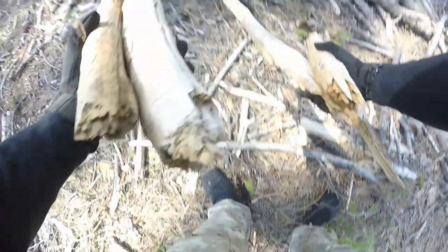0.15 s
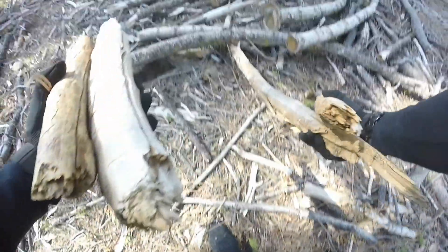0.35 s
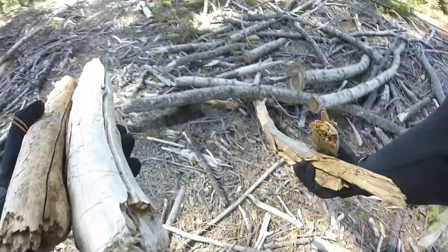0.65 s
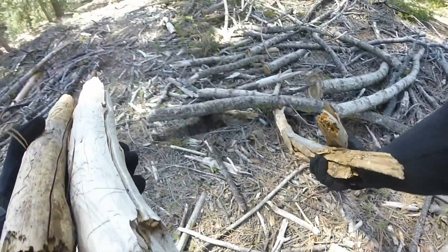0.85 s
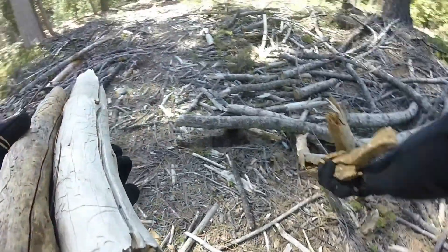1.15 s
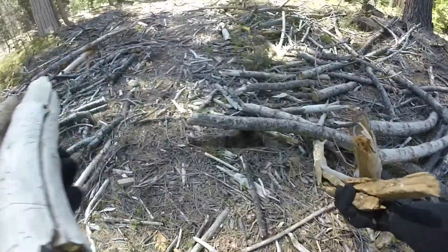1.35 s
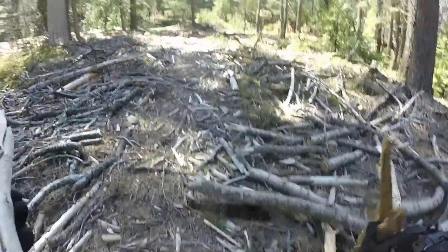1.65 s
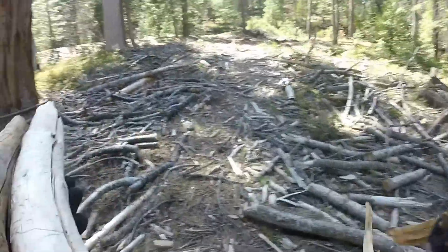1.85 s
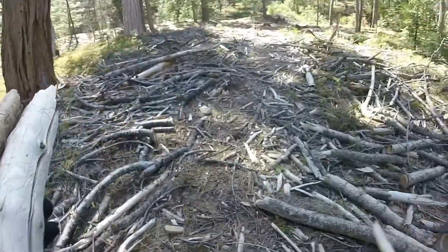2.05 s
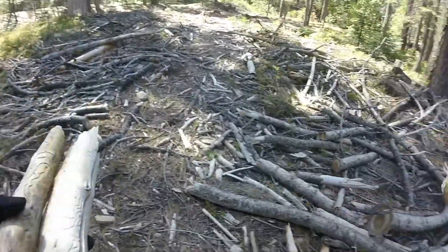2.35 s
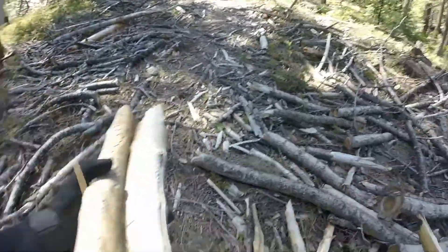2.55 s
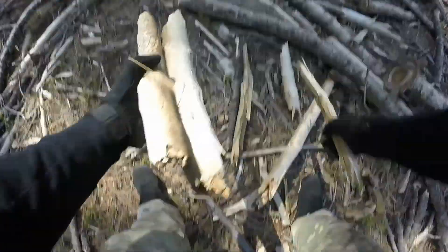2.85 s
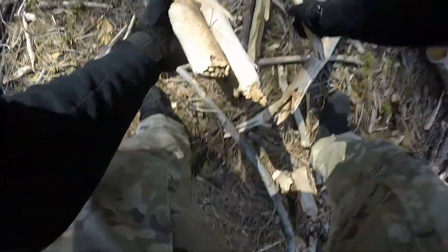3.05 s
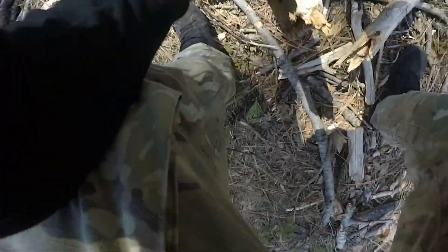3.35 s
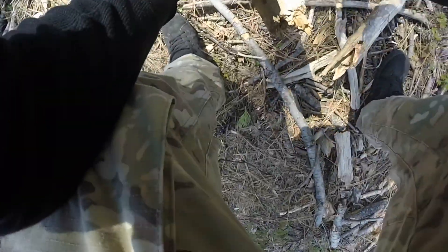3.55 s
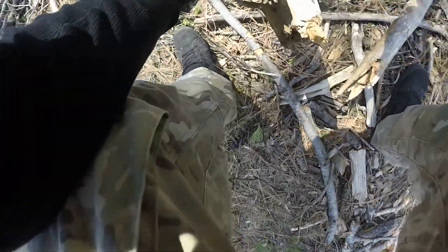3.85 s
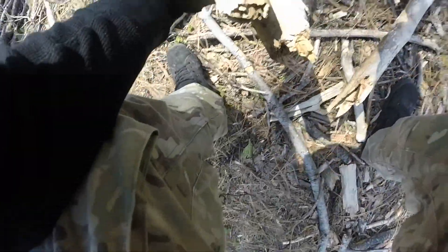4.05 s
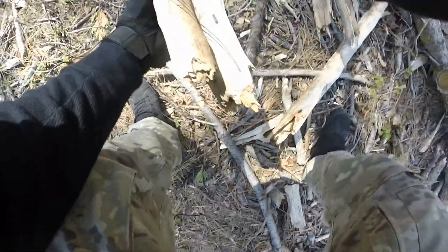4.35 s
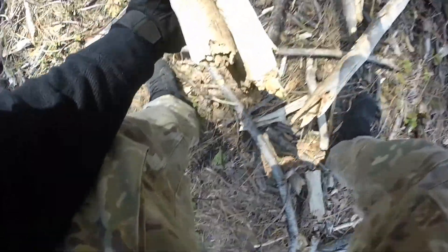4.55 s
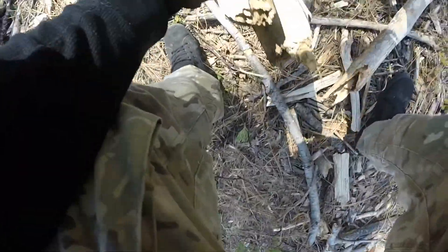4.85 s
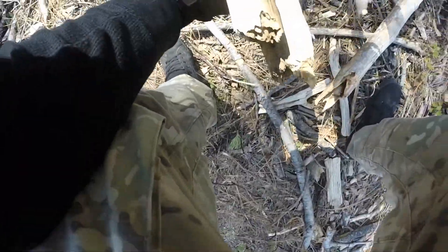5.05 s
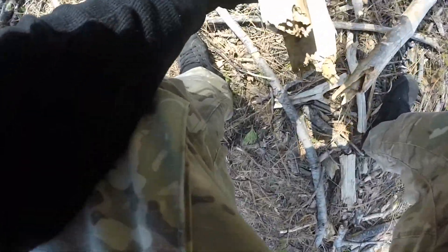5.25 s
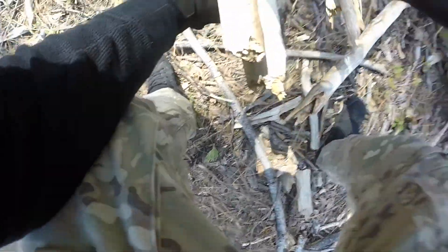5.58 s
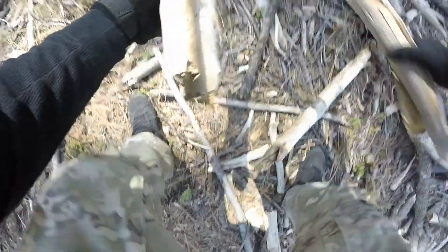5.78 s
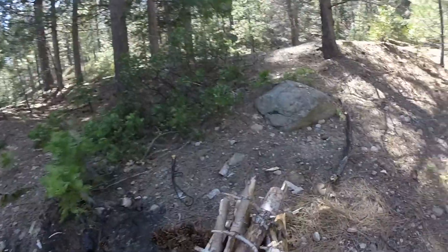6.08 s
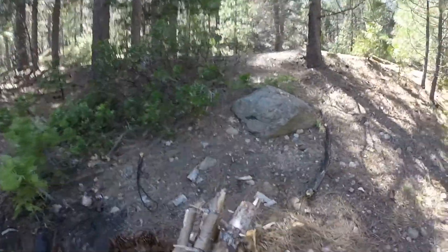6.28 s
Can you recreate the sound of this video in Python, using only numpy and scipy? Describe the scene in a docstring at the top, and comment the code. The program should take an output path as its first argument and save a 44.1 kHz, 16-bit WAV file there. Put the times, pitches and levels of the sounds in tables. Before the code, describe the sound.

Cloth rustles, brittle wood breaks in a sharp tearing crack, then knocks, stick clacks, crunching twigs and a low breeze rumble follow in a forest.

```python
"""At first clothes rustle and the dry branch gives a few cracks; then it breaks, tearing in a run of splinters.
Its pieces thump down, and gathered sticks clack together: struck wood heard as sums of damped modes.
Next come crunched twigs, dragged sticks, thumps and small squeaks: random impulses, noise and gliding sines.
Near the end the level dips briefly, a breeze rumbles as low noise, and a boot scuffs as dense grains.
Throughout, gloves, sleeves and litter rustle as coloured noise that follows the effort of the body."""
import sys
import numpy as np
from scipy import signal
from scipy.fft import rfft, irfft, next_fast_len
from scipy.io import wavfile
from scipy.ndimage import map_coordinates

SR = 44100
rng = np.random.default_rng(int(sys.argv[2]) if len(sys.argv) > 2 else 0)


def store_pcm(level_fs):
    """Save levels as 16-bit WAV."""
    pcm = np.round(np.clip(level_fs, -1, 1) * 32767).astype(np.int16)
    wavfile.write(sys.argv[1], SR, np.atleast_2d(pcm).T)


N = 283122
RING_TIME = np.arange(SR // 8) / SR  # time axis of one blow, s
BLOW_SAMPLES = SR / 100  # a blow's level is its energy spread over 10 ms


def amp(db):
    """Level to amplitude ratio: 20 dB is a factor of ten."""
    return 10 ** (np.asarray(db) / 20)


def unit(x):
    """Normalisation to an rms value of 1."""
    return x / np.sqrt(np.mean(x ** 2) + 1e-20)


def along(points, hz):
    """Logarithmic frequency scale: interpolate (f/Hz, value) points along it."""
    f, values = np.transpose(points)
    return np.interp(np.log(hz + 1), np.log(f + 1), values)


def curves(rows):
    """Linear interpolation in time: one value per sample for each column after t/s."""
    s, *columns = np.transpose(rows)
    return [np.interp(np.arange(N) / SR, s, column) for column in columns]


def wobble(rate):
    """Slow random fluctuation: a smooth curve through rate random knots a second."""
    knots = rng.standard_normal(int(N * rate / SR) + 4)
    return map_coordinates(knots, [np.arange(N) * rate / SR])


def filtered(x, response):
    """Linear filtering: the spectrum of x times a response of frequency."""
    m = next_fast_len(len(x) + SR // 2)
    hz = np.fft.rfftfreq(m, 1 / SR)
    return irfft(rfft(x, m) * response(hz), m)[:len(x)]


def coloured(x, spectrum):
    """Spectral shaping: x given a spectrum, at rms 1."""
    return unit(filtered(x, lambda hz: amp(along(spectrum, hz))))


def click(spectrum, tilt_db=0, ripple_db=3.0):
    """Minimum phase: the causal impulse of a spectrum, tilted per octave, with random small resonances."""
    n = len(RING_TIME)
    hz = np.fft.rfftfreq(n, 1 / SR)
    ripple = map_coordinates(rng.standard_normal(size=48), [np.linspace(0, 47, len(hz))])
    # the tilt starts at the second point of the spectrum
    octaves = np.log2(np.maximum(hz / spectrum[1][0], 1))
    level_db = along(spectrum, hz) + tilt_db * octaves + ripple_db * ripple
    cepstrum = irfft(np.log(amp(level_db)), n)
    # keeping only positive times of the cepstrum makes the impulse causal
    causal = 2 * cepstrum[:n // 2] * (np.arange(n // 2) > 0)
    return irfft(np.exp(rfft(causal, n)), n)


def ring(modes, scatter_db=2, detune=0.025, attack=0.00041):
    """Modal superposition: damped sines (f/Hz, level/dB, t60/s), scattered anew at every call."""
    t, out = RING_TIME, 0
    for k, (hz, db, t60) in enumerate(modes):
        phase = 2 * np.pi * hz * np.exp(detune * rng.normal()) * t
        gain = (-1) ** k * amp(db + scatter_db * rng.normal())
        out = out + gain * np.exp(-np.log(1000) * t / t60) * np.sin(phase)
    return out * (1 - np.exp(-t / attack))


def burst(length, share):
    """Cascade rupture: one main impulse, then a dying shower with share times its energy."""
    n = len(RING_TIME)
    size = amp(10 * np.minimum(rng.standard_normal(n), 2.3))
    shower = rng.standard_normal(n) * size * np.exp(-RING_TIME / length)
    shower *= np.sqrt(abs(share)) / np.linalg.norm(shower)
    shower[0] += 1
    return shower


def add(track, s, force, response, db):
    """Convolution principle: mix in at time s a force played through an impulse response."""
    wave = signal.fftconvolve(force, response)[:len(RING_TIME)]
    wave = amp(db) * np.sqrt(BLOW_SAMPLES) * wave / np.linalg.norm(wave)
    room_left = track[round(s * SR):][:len(wave)]
    room_left += wave[:len(room_left)]


def grains(rate, spread_db):
    """Random impulse process: impulses of uneven size and either sign, rate a second."""
    size_db = spread_db * np.clip(rng.standard_normal(N), -2, 2)
    return (rng.random(N) < rate / SR) * rng.choice([-1, 1], N) * amp(size_db)


def crackle(rate, spread_db, spectrum, count=6):
    """Superposed impulse trains: small snaps of a few differently coloured fibres, at rms 1."""
    voices = []
    for _ in range(count):
        voices.append(signal.fftconvolve(burst(0.0021, share=7.0), click(spectrum, ripple_db=6.5)))
    return unit(sum(signal.fftconvolve(grains(rate / count, spread_db), unit(v))[:N] for v in voices))


def strokes(rows, attack_s, release_s):
    """Trapezoidal envelope: each move (t/s at full strength, hold/s, level/dB) swells, holds and fades."""
    t, gain = np.arange(N) / SR, 0
    for s, hold, db in rows:
        gain = gain + amp(db) * np.interp(t, [s - attack_s, s, s + hold, s + hold + release_s], [0, 1, 1, 0])
    return gain


# higher modes of the wood [f/Hz, level/dB, t60/s before the life factor]
UPPER_MODES = [(1236, -1, 0.012), (1330, -1.5, 0.036), (1650, -3, 0.0079), (1920, -6, 0.048),
               (2157, 2.5, 0.02), (2337, 2, 0.035), (2820, -1, 0.012)]


def splinter(life, attack=.0001):
    """Free vibration of a small piece: randomly detuned higher modes, their t60 multiplied by life."""
    modes = [(hz, db, t60 * life) for hz, db, t60 in UPPER_MODES]
    return ring(modes, scatter_db=6.5, detune=0.11, attack=attack)


# fractures [t/s, body level/dB, ring level/dB, snap level/dB, snap tilt/(dB per octave)]
CRACKS = [(0.067, -44.5, -43, -42.5, -16), (0.167, -65, -59, -47.5, -15), (0.670, -34.5, -43, -44, -7.5),
          (1.0132, -60, -46.5, -51.5, 7), (1.033, -41.5, -33.5, -32.5, -0.5), (1.242, -50, -40, -42.5, 2),
          (1.545, -53, -31.5, -43, 9), (1.562, -13, -17.5, -24, 3), (1.5646, -17.5, -18, -31, 4),
          (1.575, -33, -22.5, -35, -3), (1.609, -23.5, -20.5, -26.5, 2), (1.635, -53, -36, -37.5, 2),
          (1.654, -33, -46, -35, 3), (1.666, -37, -32.5, -40.5, 8), (1.674, -31.5, -36, -29, -8),
          (1.6945, -38, -29.5, -38.5, 1), (1.726, -26, -35, -40, 15), (1.782, -38, -34, -42, -12),
          (1.8181, -35, -29, -48, -11), (1.8467, -32.5, -30.5, -36, -14), (1.913, -43, -40.5, -47.5, -7),
          (1.978, -43.5, -44.5, -44, 14), (2.061, -29, -34, -21.5, -8), (2.0641, -31, -30, -26.5, -0.5),
          (2.124, -46, -41.5, -41.5, 10), (2.143, -31, -37.5, -40, 15), (2.186, -19, -20.5, -27.5, -6),
          (2.3177, -42, -29.5, -44.5, -4), (3.346, -27.5, -40.5, -34, -3.5),
          (3.3544, -33.5, -48, -30.5, -8), (3.510, -43.5, -45, -48.5, -1), (3.598, -46, -59, -49, 10),
          (3.8433, -52, -53, -43.5, 10), (3.946, -51, -42.5, -47, 3), (4.005, -40, -38.5, -43.5, 7),
          (4.0273, -49, -51, -43.5, 10), (4.1797, -46, -55, -52, 4), (4.287, -41, -51, -45, 5),
          (4.370, -51, -47, -36, -4), (5.1805, -55, -49, -58, -5), (5.221, -49, -55, -43, -1),
          (5.247, -46, -51, -41, 4), (5.3065, -58, -62, -57, -2), (5.3905, -37, -38.5, -38, -10),
          (6.375, -41, -49, -44.5, 10)]
# bending modes of the breaking branch [f/Hz, level/dB, t60/s]
BRANCH_MODES = [(350, -14, .05), (525, -13, .035), (745, 0, .032), (900, -11, .025)]
# spectrum of the click of one parting fibre [f/Hz, level/dB]
SNAP_SPECTRUM = [(1200, -29.5), (2600, 3), (3500, -3), (4600, 3.5), (6000, 0.5), (7200, -7.5), (10000, -14),
                 (13500, -25), (16000, -45)]
CRACK_S = 0.0029  # time constant with which a bundle of fibres gives way


def cracks():
    """Brittle fracture: bundles of fibres give way within milliseconds and ring the branch."""
    out = np.zeros(N)
    for s, body_db, ring_db, snap_db, tilt_db in CRACKS:
        branch = ring(BRANCH_MODES, scatter_db=2.5, detune=.03, attack=.0002)
        add(out, s, burst(CRACK_S, share=0.69), branch, body_db)
        add(out, s, burst(CRACK_S, share=3.9), splinter(life=0.28), ring_db)
        add(out, s, burst(CRACK_S * 1.22, share=20), click(SNAP_SPECTRUM, tilt_db), snap_db)
    return out


# bright fibres go first, then the loosened halves sound ever more
TEAR_START_S, TEAR_END_S, TEAR_FADE_S = 1.56, 1.875, .022
TEAR_BODY_DB, TEAR_RING_DB, TEAR_SNAP_DB = -43, -41.5, -46  # levels halfway through
TEAR_BODY_DB_PER_S, TEAR_RING_DB_PER_S, TEAR_SNAP_DB_PER_S = 58, 19.5, -24


def tearing(count=6):
    """Progressive fracture: hundreds of splinters a second part as the halves are pulled away."""
    t = np.arange(N) / SR
    pulling = np.clip(np.minimum(t - TEAR_START_S, TEAR_END_S - t) / TEAR_FADE_S, 0, 1)
    from_middle = np.clip(t, TEAR_START_S, TEAR_END_S) - (TEAR_START_S + TEAR_END_S) / 2
    body, upper, snaps = np.zeros((3, N))
    for _ in range(count):
        # every break clicks, rings its splinter and shakes the branch at once
        breaks = grains(rate=75, spread_db=4.5)
        body += signal.fftconvolve(breaks, unit(ring(BRANCH_MODES, detune=0.16)))[:N]
        upper += signal.fftconvolve(breaks, unit(splinter(life=0.2)))[:N]
        snap = signal.fftconvolve(burst(0.0012, share=3), click(SNAP_SPECTRUM, tilt_db=1.5))
        snaps += signal.fftconvolve(breaks, unit(snap))[:N]
    return pulling * (amp(TEAR_BODY_DB + TEAR_BODY_DB_PER_S * from_middle) * unit(body)
                      + amp(TEAR_RING_DB + TEAR_RING_DB_PER_S * from_middle) * unit(upper)
                      + amp(TEAR_SNAP_DB + TEAR_SNAP_DB_PER_S * from_middle) * unit(snaps))


# stick against stick [t/s, pitch f/Hz, body level/dB, ring level/dB, snap level/dB]
CLACKS = [(1.1275, 780, -29, -35, -50.5), (1.6605, 824, -24.5, -51, -58), (1.7195, 726, -15, -40, -34),
          (1.774, 704, -28, -45, -43), (2.6625, 778, -17, -35.5, -60), (2.7405, 750, -24, -47.5, -67),
          (2.833, 772, -36.5, -53, -47.5), (2.9138, 725, -24, -52, -51), (2.93, 722, -22.5, -45.5, -54.5),
          (2.9981, 746, -14.5, -28, -39.5), (4.354, 706, -44.5, -66, -62)]
# bending modes of a held stick [multiple of its pitch, level/dB, t60/s]
STICK_MODES = [(0.998, 1.5, 0.028), (1.192, -8.5, 0.026), (1.42, -10.5, 0.013), (1.72, -22.5, 0.016)]
# higher modes of a held stick [f/Hz, level/dB, t60/s]
STICK_UPPER_MODES = [(1306, 2, 0.031), (1530, -6, 0.019), (1737, 3.5, 0.022), (2310, -0.5, 0.013)]


def clacks():
    """Contact time as a low-pass: blunt blows between sticks wake mostly their lowest mode."""
    out = np.zeros(N)
    for s, pitch_hz, body_db, ring_db, snap_db in CLACKS:
        modes = [(pitch_hz * ratio, db, t60) for ratio, db, t60 in STICK_MODES]
        stick = ring(modes, detune=.004, attack=0.0017)
        add(out, s, burst(0.0021, share=0.025), stick, body_db)
        add(out, s, burst(0.0019, share=0.87), ring(STICK_UPPER_MODES, attack=0.00019), ring_db)
        add(out, s, burst(0.004, share=8.5), click(SNAP_SPECTRUM, tilt_db=-12), snap_db)
    return out


# dull knocks of wood and boots
# [t/s, reference pitch f/Hz, reference t60/s, body level/dB, ring level/dB, snap level/dB]
THUMPS = [(0.1221, 778, 0.019, -17, -59, -42.5), (1.7569, 690, 0.0096, -24.5, -44, -63),
          (1.799, 660, 0.026, -26.5, -36, -46), (2.1731, 608, 0.036, -13, -27, -39.5),
          (2.185, 680, 0.053, -11, -27, -37), (2.261, 672, 0.052, -22.5, -34.5, -47.5),
          (3.3455, 424, 0.026, -25.5, -45, -50), (3.355, 656, 0.056, -26.5, -50, -55),
          (3.368, 600, 0.061, -31.5, -41.5, -58), (3.392, 650, 0.043, -35, -61, -62),
          (5.413, 386, 0.013, -34.5, -56, -62), (6.216, 422, 0.072, -31.5, -69, -48.5),
          (6.328, 810, 0.01, -36, -55, -55), (6.3603, 584, 0.003, -27, -51, -51)]
# modes of a piece lying on the ground [multiple of its pitch, level/dB, multiple of its t60]
GROUNDED_MODES = [(.36, -13.5, 1.3), (.53, -4, 1.1), (0.779, 1, .9), (1.02, 2, 1), (1.25, 2, .7),
                  (1.58, -6, .7)]


def thumps(soil_hz=145, soil_db=-16):
    """Damping by contact: the ground quickly drains the wood's modes; grit crunches under it."""
    out = np.zeros(N)
    for s, pitch_hz, decay, body_db, ring_db, snap_db in THUMPS:
        modes = [(pitch_hz * ratio, db, decay * life) for ratio, db, life in GROUNDED_MODES]
        # the longer a piece rings, the more it shakes the soil
        soil = (soil_hz, soil_db + 12 * np.log2(decay / 0.0566), .08)
        # the first push of the impact is a single heavily damped swing
        push = (pitch_hz, 4, .005)
        wood = ring([push] + modes + [soil], scatter_db=1.2, attack=.0002)
        add(out, s, burst(decay * .08, share=0.065), wood, body_db)
        add(out, s, burst(decay * 0.15, share=9.0), splinter(life=0.23), ring_db)
        add(out, s, burst(decay * 0.14, share=17.0), click(SNAP_SPECTRUM, tilt_db=6.0), snap_db)
    return out


# dry wood catching and squeaking [middle t/s, f/Hz, level/dB of the peak, half length/s]
SQUEAKS = [(1.7108, 3000, -16, 0.0015), (3.641, 2250, -34.5, 0.0076), (5.222, 2400, -39.5, 0.0082),
           (5.346, 4830, -46.5, 0.0039), (5.455, 4730, -48, .008)]


def squeaks():
    """Stick-slip oscillation: dry surfaces catch and slide briefly near one pitch."""
    out, t = np.zeros(N), np.arange(N) / SR
    for s, hz, db, length in SQUEAKS:
        near = abs(t - s) < 4 * length
        unsteady_hz = hz * (1 + 0.042 * wobble(900)[near])
        phase = 2 * np.pi * np.cumsum(unsteady_hz) / SR
        out[near] += amp(db) * np.exp(-((t[near] - s) / length) ** 2) * np.sin(phase)
    return out


# how hard the body works, as the level of its rustle [t/s, level/dB]
EFFORT = [(0.0, -47), (0.63, -50.5), (1.4, -48), (1.69, -37), (1.9, -45), (2.48, -50.5), (2.66, -46.5),
          (2.8, -50.5), (2.92, -49), (3.78, -50.5), (4.02, -47), (4.45, -53.5), (4.71, -54), (5.31, -50),
          (5.51, -53), (5.85, -52.5)]
GLOVE_DB, SLEEVE_DB, LITTER_DB = 0, -10.5, -13.5  # steady rustle of each, relative to the effort
# a glove takes a new grip on bark [t/s, hold/s, level/dB]
GRIPS = [(1.08, 0.015, -54), (1.44, 0.037, -41.5), (2.34, 0.037, -46), (2.61, 0.086, -41),
         (3.99, 0.04, -42.5), (4.885, 0.011, -50), (5.22, .04, -49), (6.25, 0.13, -46)]
GRIP_ATTACK_S, GRIP_RELEASE_S = 0.06, 0.038
# an arm swings and its sleeve swishes [t/s, hold/s, level/dB]
SWISHES = [(0.29, 0.21, -54.5), (0.645, 0.044, -46.5), (0.82, 0.029, -52.5), (1.06, 0.038, -54.5),
           (1.33, 0.16, -51.5), (1.97, 0.052, -52.5), (2.865, 0.073, -47), (3.16, 0.12, -57.5),
           (3.615, 0.013, -53), (5.19, .04, -56.5), (6.29, .06, -55.5)]
SWISH_ATTACK_S, SWISH_RELEASE_S = 0.063, 0.028
# dry twigs and needles are pressed [t/s, hold/s, level/dB]
CRUNCHES = [(0.02, 0.16, -62.5), (1.055, 0.038, -53.5), (1.38, 0.12, -57.5), (1.88, .15, -52.5),
            (2.32, 0.19, -59.5), (2.58, .1, -54.5), (3.49, 0.031, -55), (3.6, 0.031, -46.5),
            (3.865, 0.17, -48), (4.16, 0.14, -53), (4.755, 0.15, -57), (5.22, .17, -55)]
CRUNCH_ATTACK_S, CRUNCH_RELEASE_S = 0.037, 0.036
# spectrum of glove friction [f/Hz, level/dB per Hz]
GLOVE_SPECTRUM = [(60, -18), (150, -9.5), (320, 0.5), (520, -1), (760, -1.5), (1000, -6.5), (1400, -20),
                  (3000, -41)]
# spectrum of sleeve friction [f/Hz, level/dB per Hz]
SLEEVE_SPECTRUM = [(600, -20.5), (1200, -5.5), (1750, -1.5), (2100, -2), (2400, -2), (3400, -9),
                   (4500, -17.5), (5700, -18.5), (7000, -24), (14000, -46.5)]
# spectrum of twigs and needles [f/Hz, level/dB per Hz]
TWIGS_SPECTRUM = [(1200, -10.5), (2400, 7), (3500, -3.5), (4700, 2), (6000, -1), (7200, -9.5), (8200, -8.5),
                  (10000, -10), (13500, -23), (16000, -24.5)]


def handling():
    """Friction noise: gloves, sleeves and litter rustle with the effort and swell in single moves."""
    effort_db, = curves(EFFORT)
    # steady rustle and single moves add as energies
    grip = np.hypot(amp(effort_db + GLOVE_DB), strokes(GRIPS, GRIP_ATTACK_S, GRIP_RELEASE_S))
    swing = np.hypot(amp(effort_db + SLEEVE_DB), strokes(SWISHES, SWISH_ATTACK_S, SWISH_RELEASE_S))
    presses = strokes(CRUNCHES, CRUNCH_ATTACK_S, CRUNCH_RELEASE_S)
    pressure = np.hypot(amp(effort_db + LITTER_DB), presses)
    stick_slip = wobble(70)
    glove = grip * amp(2.6 * stick_slip) * coloured(rng.standard_normal(N), GLOVE_SPECTRUM)
    sleeve = swing * amp(1.76 * stick_slip) * coloured(rng.standard_normal(N), SLEEVE_SPECTRUM)
    # light contact mostly hisses; under pressure the energy goes into separate snaps of twigs
    breaking = .9 / (1 + (amp(-60) / pressure) ** 2)
    hiss = np.sqrt(1 - breaking) * coloured(rng.standard_normal(N), TWIGS_SPECTRUM)
    crunch = np.sqrt(breaking) * crackle(rate=170, spread_db=6.5, spectrum=TWIGS_SPECTRUM)
    return glove + sleeve + pressure * (hiss + crunch)


# a stick is dragged across others [t/s, hold/s, level/dB before the rasp's fluctuation]
DRAGS = [(3.88, 0.081, -52), (4.18, 0.025, -56.5), (4.96, 0.23, -60.5), (5.22, 0.22, -57.5)]
DRAG_ATTACK_S, DRAG_RELEASE_S = 0.03, 0.053
# spectrum of rasping bark [f/Hz, level/dB per Hz]
BARK_SPECTRUM = [(1800, -25), (2250, -8), (2420, 5.5), (2620, -16), (3500, -13), (4400, -7), (5100, -3),
                 (6100, -4), (7000, -19), (10000, -22), (16000, -42)]


def drag():
    """Friction of rough surfaces: bark catches on bark in a fine, resonant rasp of impulses."""
    rasp = amp(2.4 * wobble(45)) * coloured(grains(rate=700, spread_db=7), BARK_SPECTRUM)
    return strokes(DRAGS, DRAG_ATTACK_S, DRAG_RELEASE_S) * rasp


# a boot drags over the soil [t/s, hold/s, level/dB]
SCUFFS = [(6.25, 0.06, -44.5)]
SCUFF_ATTACK_S, SCUFF_RELEASE_S = .02, 0.11
# spectrum of scuffed soil [f/Hz, level/dB per Hz]
SOIL_SPECTRUM = [(300, -10), (600, -7), (800, 6), (1300, 4), (1700, -10), (2600, -20), (6000, -36)]


def scuff():
    """Granular friction: a sole grinds over dry soil in a dense run of small impulses."""
    grinding = crackle(rate=900, spread_db=5, spectrum=SOIL_SPECTRUM)
    return strokes(SCUFFS, SCUFF_ATTACK_S, SCUFF_RELEASE_S) * grinding


# a shift of weight jolts the camera [t/s, hold/s, level/dB before the fluctuation]
JOLTS = [(0.962, .015, -40.5), (2.76, 0.15, -51.5), (3.36, 0.036, -44), (4.28, 0.013, -40.5),
         (4.76, 0.023, -41)]
JOLT_ATTACK_S, JOLT_RELEASE_S = 0.024, .035
# spectrum of the swaying camera's rumble [f/Hz, level/dB per Hz]
RUMBLE_SPECTRUM = [(15, 1), (30, 0.5), (60, -4.5), (120, -7), (200, -13.5), (500, -34), (1500, -69)]
SWAY_DB, SWAY_FOLLOWS = -53, 0.24  # rumble at mean effort, before fluctuation; its dB per dB of effort


def camera_sway():
    """Inertial excitation: body movement rumbles unevenly on the microphone (effort as in handling)."""
    effort_db, = curves(EFFORT)
    rocking = amp(SWAY_DB + SWAY_FOLLOWS * (effort_db - effort_db.mean()))
    shaking = np.hypot(rocking, strokes(JOLTS, JOLT_ATTACK_S, JOLT_RELEASE_S))
    return shaking * amp(0.71 * wobble(14)) * coloured(rng.standard_normal(N), RUMBLE_SPECTRUM)


# a breeze catches the microphone [t/s, hold/s, level/dB]
BREEZES = [(5.945, 0.29, -43.5)]
BREEZE_ATTACK_S, BREEZE_RELEASE_S = 0.013, 0.32
# spectrum of the breeze [f/Hz, level/dB per Hz]
GUST_SPECTRUM = [(15, 1), (40, -18), (65, 10.5), (95, -8.5), (135, 2), (190, -13), (300, -18), (1000, -66)]


def breeze():
    """Flow noise: moving air presses on the microphone as low-frequency random noise."""
    gust = coloured(rng.standard_normal(N), GUST_SPECTRUM)
    return strokes(BREEZES, BREEZE_ATTACK_S, BREEZE_RELEASE_S) * gust


# echo among the trunks [f/Hz, t60/s]
FOREST_DECAY = [(150, 0.11), (800, 0.074), (3000, 0.11), (12000, 0.17)]


def forest(x):
    """Diffuse scattering: ground and trunks return x as noise that decays at its own rate per frequency."""
    hz, t, bins = signal.stft(rng.standard_normal(SR // 2), SR, nperseg=256)
    decay = np.exp(-np.log(1000) * t / along(FOREST_DECAY, hz)[:, None])
    tail = signal.istft(bins * decay, SR, nperseg=256)[1]
    delay = round(.006 * SR)
    return signal.fftconvolve(x, np.pad(tail / np.linalg.norm(tail), (delay, 0)))[:N]


RADIATION_HZ = 222  # below this, air slips round a thin stick instead of carrying its sound


def radiated(x):
    """Acoustic short circuit: a second-order high-pass for the radiation of thin sticks."""
    return filtered(x, lambda f: -f * f / (RADIATION_HZ ** 2 - f * f + 1j * f * RADIATION_HZ))


# the level of everything dips briefly
DIP_AT_S, DIP_DB, DIP_FALL_S, DIP_RETURN_S = 5.920, -22, .030, .016


def scene():
    """Superposition: the wood, its faint echo and the movement around it add linearly."""
    wood = radiated(cracks() + clacks()) + thumps() + tearing() + squeaks()
    movement = handling() + drag() + scuff() + camera_sway() + breeze()
    echo = amp(-21) * forest(wood)
    dip_db = np.interp(np.arange(N) / SR - DIP_AT_S, [-DIP_FALL_S, 0, DIP_RETURN_S], [0, DIP_DB, 0])
    return (amp(dip_db) * (wood + echo + movement))[None]


# resonances of the camera case [f/Hz, width/Hz, level/dB]
CASE_RESONANCES = [(2412, 53, -16), (5720, 170, -15), (13700, 730, -4.5)]
TOP_HZ = 15700  # band limit of the camera


def record(dry):
    """Resonance, saturation, band limit: the case colours, peaks are rounded off, the top is cut."""
    def case(f):
        """Parallel resonators: band-pass responses added to the direct sound."""
        return 1 + sum(amp(db) * 1j * f * width / (centre * centre - f * f + 1j * f * width)
                       for centre, width, db in CASE_RESONANCES)

    heard = filtered(dry[0], case)
    rounded = heard / (1 + heard ** 6) ** (1 / 6)  # approaches full scale smoothly
    return filtered(rounded, lambda hz: 1 / np.sqrt(1 + (hz / TOP_HZ) ** 160))[None]


dry = scene()
out = record(dry)
store_pcm(out)
```